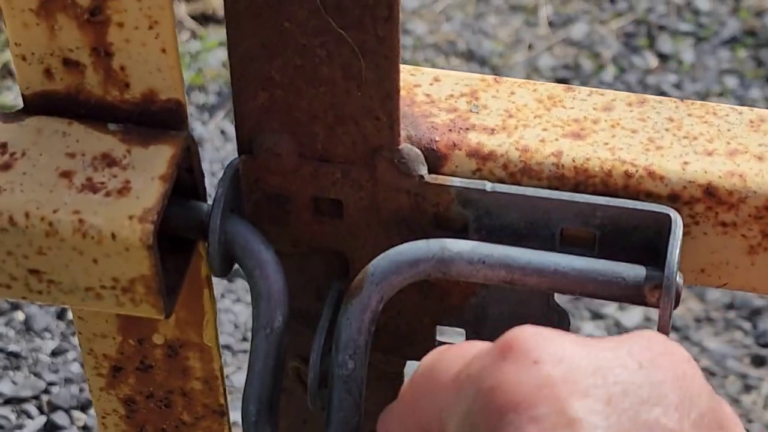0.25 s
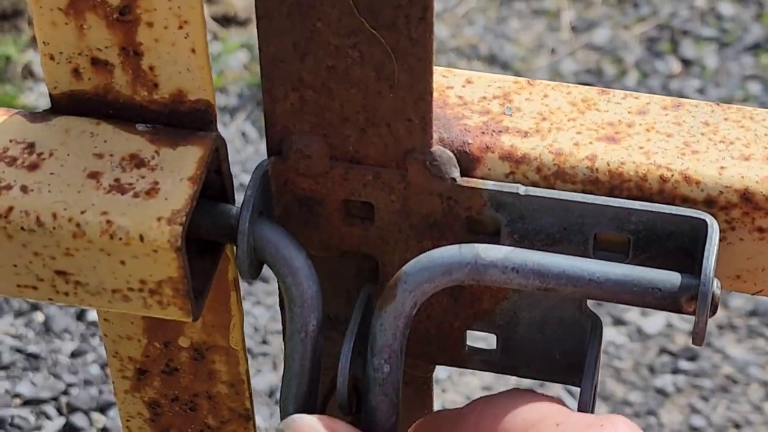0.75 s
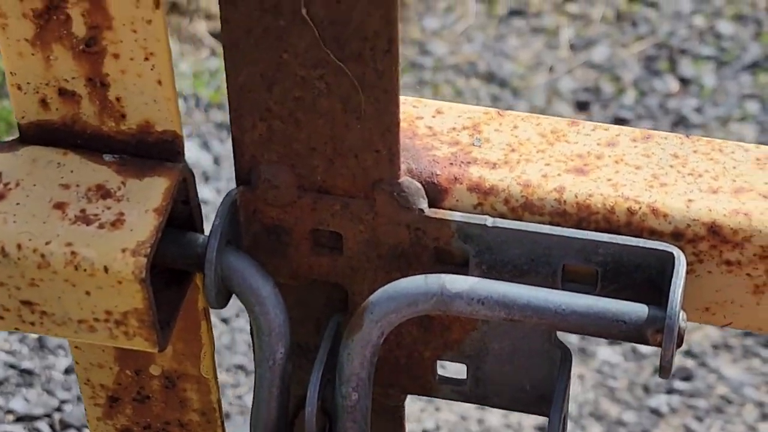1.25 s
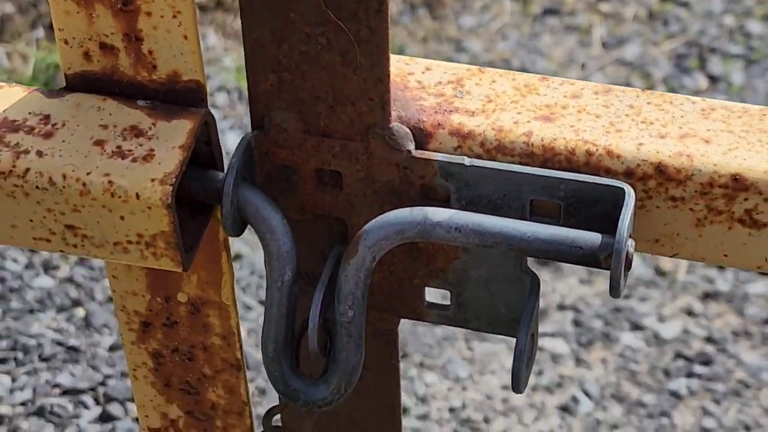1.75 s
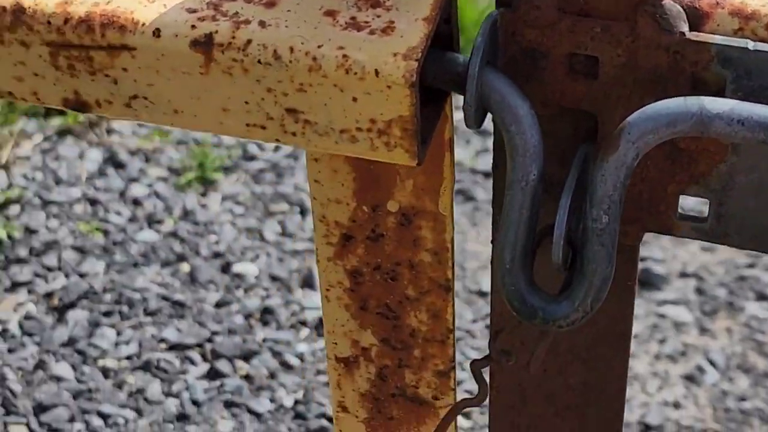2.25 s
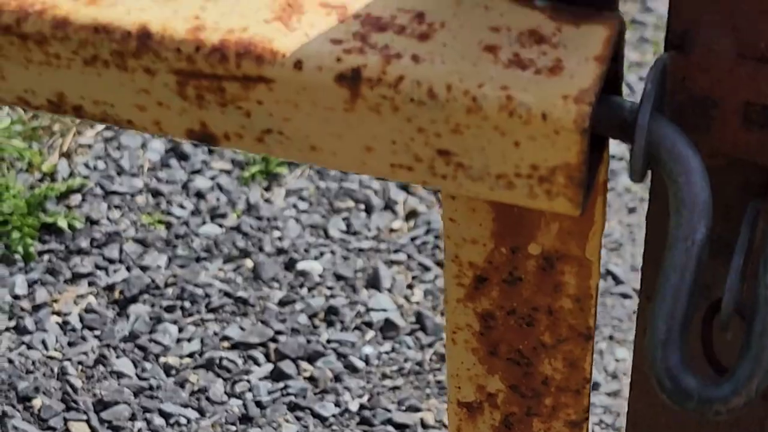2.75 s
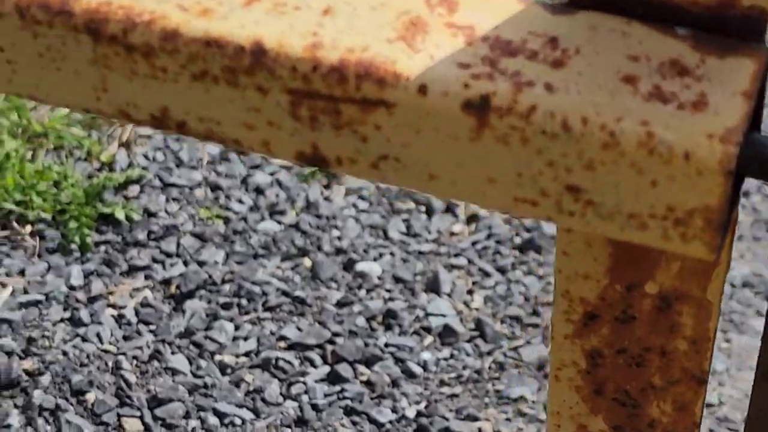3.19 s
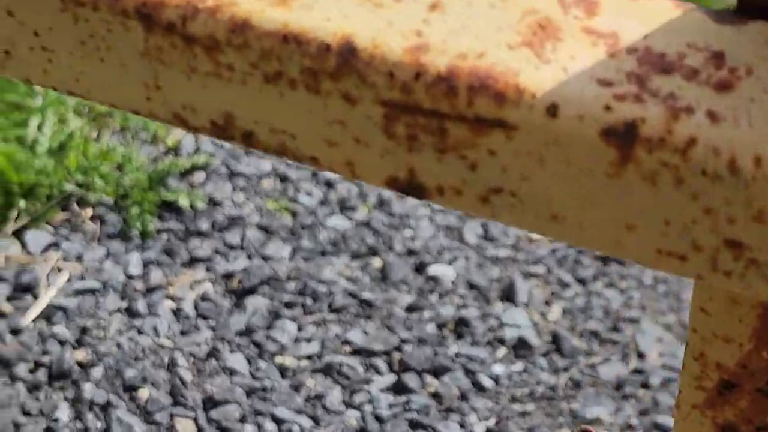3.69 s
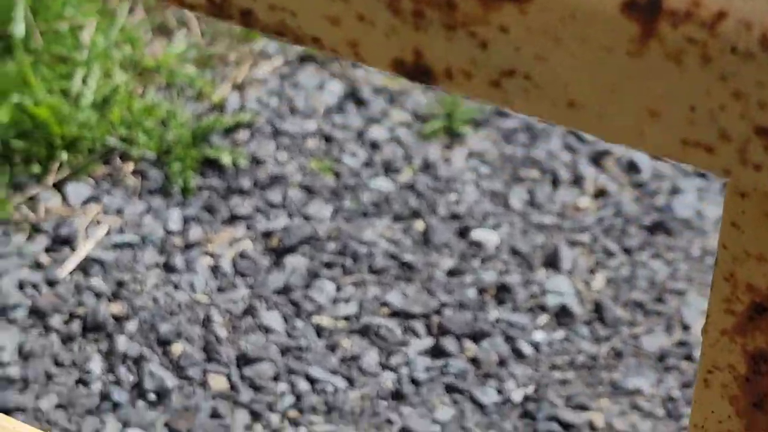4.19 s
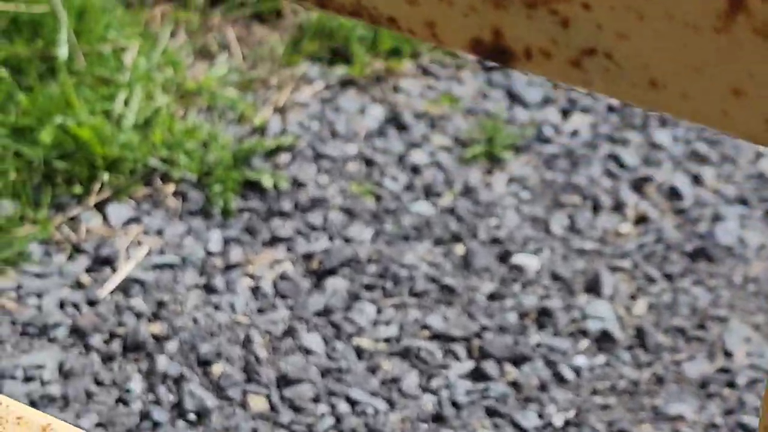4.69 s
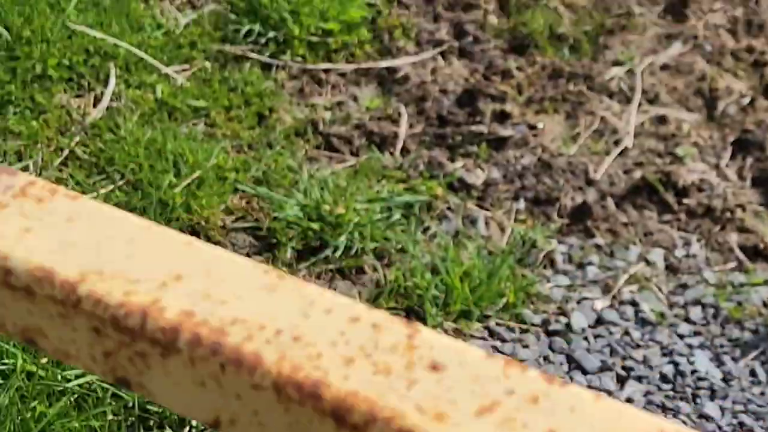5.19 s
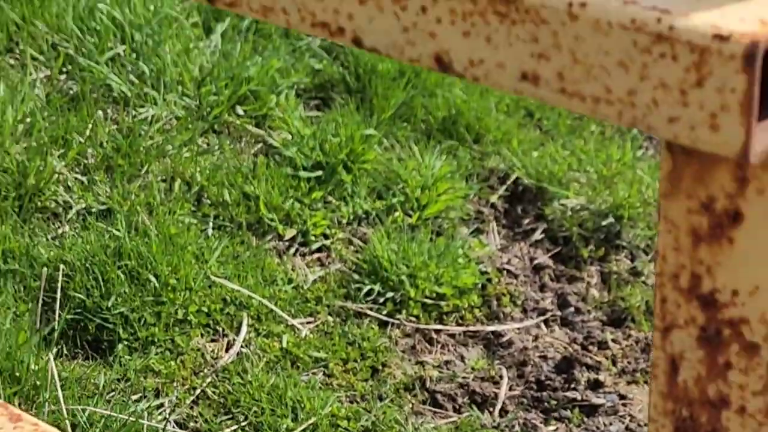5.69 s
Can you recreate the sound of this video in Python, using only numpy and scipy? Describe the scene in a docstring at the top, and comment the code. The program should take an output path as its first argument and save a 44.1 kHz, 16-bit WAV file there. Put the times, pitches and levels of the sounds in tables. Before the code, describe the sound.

Outdoors in rumbling wind, a gate latch clanks loudly, rattles and scrapes on rust, clanks again, then gravel crunches softly with dull ticks.

```python
"""A steel bolt is shot home on a rusty tubular farm gate; the gate then shifts, scraping and knocking on the bolt.
Each blow rings modes of bolt and frame under a dense burst; slips on the rust excite the same contacts.
Shaped noise buffets the microphone as wind throughout, over a faint hiss, a far drone and a few soft bumps;
gliding sines are far birds. Near the end gravel crunches softly as filtered grit, with a few dull ticks."""
import sys
import numpy as np
from scipy import signal
from scipy.fft import rfft, irfft, next_fast_len
from scipy.io import wavfile
from scipy.ndimage import uniform_filter1d

SR = 44100
rng = np.random.default_rng(int(sys.argv[2]) if len(sys.argv) > 2 else 0)


def wrap_up_sound(samples):
    """Save the sound to the file named by the first command line argument, as 16-bit audio."""
    columns = np.atleast_2d(samples).T
    # keep every value between -1 and 1, then stretch to whole-number steps
    tamed = np.clip(columns, -1, 1)
    steps = np.round(tamed * 32767).astype(np.int16)
    wavfile.write(sys.argv[1], SR, steps)


N = 261954
TIME = np.arange(N) / SR
RING = TIME[:12288]  # time axis of one ring
STEPS = TIME[::32]  # coarse time axis for slow gains
GRIP_DB_PER_S, LET_GO_DB_PER_S = 905.5, 599  # how fast rubbing sets in and dies away

# how ringing time varies with pitch: pitch_hz, factor on the ring time
DAMPING = [(600, 2.7), (2000, 1.2), (5000, 0.71), (10000, 0.59), (16000, 0.91)]


def amp(db):
    """Turns dB into a gain."""
    return 10 ** (np.asarray(db) / 20)


def evened(x):
    """Scales a signal to rms 1."""
    return x / np.sqrt(np.mean(x ** 2) + 1e-20)


def struck(x, size=350):
    """Scales a ring so that its first 8 ms (size in samples) have rms 1."""
    return x / np.sqrt(np.mean(x[:, :size] ** 2) + 1e-20)


def read(points, hz):
    """Reads a frequency table at any pitch, on a logarithmic pitch axis."""
    f, value = np.transpose(points)
    return np.interp(np.log(hz + 1), np.log(f + 1), value)


def level(rows, axis=1):
    """Draws a dB column over time as a gain for every sample."""
    rows = np.array(rows)
    return amp(np.interp(TIME, rows[:, 0], rows[:, axis]))


def add(mix, s, sound):
    """Lays a sound into the mix at s seconds."""
    part = mix[:, max(round(s * SR), 0):][:, :sound.shape[1]]
    part += sound[:, :part.shape[1]]


def pair(hz, same):
    """Random phasors for two ports, alike by the share same (0-1)."""
    a, b = np.exp(2j * np.pi * rng.random((2, len(hz))))
    return np.array([a, same * a + np.sqrt(1 - same ** 2) * b])


def noise(spectrum, same):
    """Stereo noise of a given colour, rms 1."""
    hz = np.fft.rfftfreq(next_fast_len(N + SR, True), 1 / SR)
    return evened(irfft(pair(hz, same) * amp(read(spectrum, hz)))[:, :N])


def swell(rate_hz):
    """Slow random wandering with rms 1."""
    hz = np.fft.rfftfreq(N, 1 / SR)
    return evened(irfft(np.exp(2j * np.pi * rng.random(len(hz)) - (hz / rate_hz) ** 2), N))


def grit(per_s, spread_db, bed):
    """Sparse slips of uneven size over a bed of fine ones, rms 1."""
    size = rng.standard_normal(N) * amp(spread_db * np.minimum(rng.exponential(1, N), 3))
    slips = (rng.random(N) < per_s / SR) * size
    return evened(evened(slips) + bed * rng.standard_normal(N))


def strokes(rows, rise_db_per_s, fall_db_per_s):
    """Gain of rubbing strokes: each sets in, holds while it grows or eases, and dies away."""
    s, length, db, growth_db = np.transpose(rows)[:, :, None]
    early = np.maximum(s - STEPS, 0)
    late = np.maximum(STEPS - s - length, 0)
    held_db = db + growth_db * np.clip((STEPS - s) / length, 0, 1)
    gains = amp(np.maximum(held_db - rise_db_per_s * early - fall_db_per_s * late, -150))
    return np.interp(TIME, STEPS, np.linalg.norm(gains, axis=0))


def latch(modes_db=1.8, mode_hold=0.77, crack=.6, crack_s=.004, rise_s=0.00079, pressed_s=0.032, pan_db=-2.84):
    """Every blow cracks and rings; until the next one, slips on the rust excite the same contact."""
    # steel on steel: start_s, level_db over the first 8 ms, brightness_db_per_octave, contact pitch_hz,
    # contact strength_db, nominal ring t60_s, share of the modal ring in the bolt (0-1)
    blows = [(0.028, -52.5, -5.5, 2850, 5, 0.069, 0.9), (0.307, -51.5, -1, 10770, 11, 0.09, .2),
             (0.3208, -37, -4, 4600, 8.5, 0.097, 0.95), (0.4927, -31, -2, 2530, 11, 0.56, 1),
             (0.589, -18.5, 2, 2260, -7, 0.26, 0.14), (0.593, -21, -1.5, 2040, 6.5, 0.53, 0.98),
             (0.6852, -13, 2, 2540, 5.5, 0.32, 0.96), (0.692, -14, 3, 4570, 10, 0.062, 1),
             (0.707, -16, 3.5, 2640, 4.5, 0.34, 0.66), (0.725, -10, 4.5, 1570, 8.5, .22, 0.89),
             (0.836, -28.5, -1.5, 3750, 1, 0.14, 1), (0.861, -36.5, -7, 2760, 10, .11, 0.87),
             (2.357, -39.5, -0.5, 3050, 0.5, 0.2, .2), (2.463, -38, -2, 2340, 5, 0.23, 0),
             (2.548, -30, -6.5, 3800, 22.5, 0.16, 0), (2.56, -33, -6, 3720, -0.5, 0.068, 0),
             (2.655, -45, -9, 3490, -1, 0.14, .25), (2.702, -35, -4, 3740, 20.5, 0.17, 0.15),
             (2.722, -30, -2, 2650, 13, 0.12, 0.04), (2.728, -28.5, -1.5, 3780, 8.5, 0.27, 0),
             (2.772, -22.5, -1.5, 4700, 7.5, 0.11, 0.92), (2.995, -46.5, -6.5, 2640, 1.5, 0.064, 0.38),
             (3.193, -46.5, -2.5, 3040, 8, .11, .1), (3.226, -44.5, -3, 5080, -1, 0.13, 0.4),
             (3.293, -34.5, -1, 6030, 8, 0.18, 0.12), (3.422, -44, -5, 1430, 14, .08, 0.1),
             (3.437, -40, -6.5, 13200, 11, 0.076, 0.1), (3.451, -30, -8, 3450, 14, 0.1, 0.15),
             (3.473, -42.5, -7, 800, 10, 0.23, .1), (3.52, -37.5, -12.5, 12440, 22, 0.18, 0),
             (3.561, -41, -9.5, 13000, 15, 0.097, 0.3), (3.691, -44.5, 1, 3490, 14, 0.067, .1),
             (3.701, -28, -4.5, 3380, 5.5, 0.12, 0.03), (3.801, -40, -2.5, 3830, 6, 0.11, 0),
             (3.875, -40, -2.5, 12900, 9, 0.14, 0.4), (3.908, -28.5, -1.5, 1500, 8.5, 0.14, .45),
             (3.921, -23, -5, 3100, 13.5, 0.078, 0.6), (4.004, -35.5, -6, 13000, 7, 0.08, 0),
             (4.049, -35, -7.5, 12900, 12.5, 0.15, 0.7), (4.111, -44.5, -6.5, 12900, 16, 0.12, 0.15),
             (4.135, -40.5, -4.5, 1300, 7, 0.16, 0.14), (4.297, -34.5, -3, 1340, 8, 0.11, 0),
             (4.323, -43, -2, 1310, -1.5, 0.064, 0), (4.38, -33, -1.5, 2080, 10.5, 0.17, .25),
             (4.401, -16.5, -4, 13200, 10, 0.17, 0.4), (4.405, -19, 1, 2950, 20, 0.14, 0.5),
             (4.437, -23, -2, 1346, -1, .1, 0.2), (4.4437, -16, 4.5, 1430, 5, 0.17, 0),
             (4.46, -21.5, -0.5, 2380, 7, 0.18, 1), (4.48, -20, -4, 11000, 13.5, 0.14, 0.73),
             (4.49, -20.5, 4.5, 900, 22, 0.19, 0.14), (4.705, -43.5, -4.5, 3490, 5.5, 0.13, 0.1),
             (5.281, -48, -4.5, 7450, 2.5, 0.3, .1)]
    # modes of the bolt and its bracket: pitch_hz; relative level_db
    bolt_hz = [1510, 1555, 1916, 2231, 2580, 2734, 2917, 3160, 4044, 4848, 5089, 5362, 5812, 6330, 6870,
               7345, 8182, 8328, 9011, 9350, 9528, 10067, 10869, 11857, 11908, 12801, 13641, 14362]
    bolt_db = [-3, -12.5, -6.5, -1, -2.5, -13, -9, 1, 0, 2, -1.5, -0.5, 5, 2.5, 0.5, -1.5, -4.5, 0, -3,
               -6.5, -5.5, -2.5, -9, 1, -1.5, -12.5, -21.5, -4]
    # modes of the gate frame: pitch_hz; relative level_db
    frame_hz = [800, 912, 1065, 1205, 1388, 1490, 1582, 1894, 2050, 2366, 2550, 2734, 2940, 3095, 3231,
                3655, 3755, 4085, 4775, 5361, 5500, 6310, 7335, 7505, 8250, 9646, 10058, 11347, 13030,
                14351]
    frame_db = [-15.5, -15.5, -9, -8, -5, -9, -7.5, -0.5, -2.5, -0.5, -1, 1, 1, -5.5, 0.5, -6, -8, 0, 5.5,
                -3, 3.5, 0, 8.5, -3, -10, -7.5, -2, -12.5, -7.5, -3]
    bolt, frame = waves(bolt_hz, bolt_db), waves(frame_hz, frame_db)
    pan = amp([[pan_db / 2], [-pan_db / 2]])  # left minus right
    slips = rubbing()
    travel = swell(rate_hz=6.4)  # the rubbing wanders between two spots of rust
    edges = [0] + [round(row[0] * SR) for row in blows[1:]] + [N]
    out = np.zeros((2, N))
    for (s, db, *colour, t60, share), a, b in zip(blows, edges, edges[1:]):
        hold = t60 * mode_hold
        modes = np.sqrt(share) * ring(bolt, colour, hold) + np.sqrt(1 - share) * ring(frame, colour, hold)
        free = min(t60 / .15, 1.2)  # parts that stay pressed together ring less
        cracked = clash(colour, t60) * (1 + crack * np.exp(-RING / crack_s))
        sound = cracked + amp(modes_db) * free * modes
        sound = sound * (1 - np.exp(-RING / rise_s))  # rust cushions the contact
        sound = struck(sound * pan)
        add(out, s, amp(db) * sound)
        span = slice(a, max(b, a + 1))
        for spot, weight in (sound, np.cos), (clash(colour, t60), np.sin):
            damped = (spot * np.exp(-RING / pressed_s))[:, :len(RING) // 2]
            rub = signal.fftconvolve((slips[span] * weight(travel[span]))[None], damped, axes=1)
            add(out, a / SR, rub / np.sqrt((damped ** 2).sum() / 2))
    return out


def waves(hz, db):
    """The undamped oscillation of every mode."""
    hz = np.array(hz, float)
    return hz, (amp(db)[:, None] * np.exp(2j * np.pi * hz[:, None] * RING)).astype(np.complex64)


def ring(body, colour, t60, scatter_db=3.5, clear_hold=1.79):
    """Each blow weights the modes differently; damping varies with pitch, and a few clear modes sing on."""
    # modes that ring longer than their neighbours: pitch_hz
    clear_hz = [912, 7505, 10058, 11347]
    hz, shapes = body
    scatter = amp(scatter_db * rng.standard_normal(len(hz)))
    weight = pair(hz, 0.7) * ports(hz) * contact(hz, *colour) * scatter
    hold = t60 * read(DAMPING, hz) * np.where(np.isin(hz, clear_hz), clear_hold, 1)
    fall = (np.log(1000) / hold).astype(np.float32)
    decay = np.exp(-fall[:, None] * RING.astype(np.float32))
    return struck((weight.astype(np.complex64) @ (shapes * decay)).real)


def clash(colour, t60, count=170):
    """A crowd of weaker modes, other ones at each contact, merges into a burst."""
    # colour of the crowd: pitch_hz, relative density_db per Hz
    steel = [(150, -56), (500, -23.5), (850, -15.5), (1200, -12), (1600, -9), (2200, -2.5), (3100, -5),
             (4200, -0.5), (6200, 0), (8000, -1), (9600, -4.5), (10700, -10.5), (12000, -7), (16000, -20.5)]
    hz = np.fft.rfftfreq(len(RING), 1 / SR)
    crowd = np.full(len(hz), .12)
    crowd[rng.integers(100, len(hz), count)] = 1
    burst = irfft(crowd * pair(hz, 0.26) * ports(hz) * amp(read(steel, hz)) * contact(hz, *colour))
    # every band dies away at its own rate
    f, t, z = signal.stft(burst, SR, nperseg=256)
    z = z * amp(-60 * t / (t60 * read(DAMPING, f)[:, None]))
    return struck(signal.istft(z, SR, nperseg=256)[1][:, :len(RING)])


def contact(hz, slope_db, focus_hz, focus_db, width=.33):
    """Harder contacts are brighter, and each favours one region of pitch (width in octaves)."""
    bump = np.exp(-(np.log2((hz + 1) / focus_hz) / width) ** 2)
    return amp(slope_db * np.log2(np.maximum(hz, 1200) / 4000) + focus_db * bump)


def ports(hz):
    """Phase and level at the two ports for sound from the latch."""
    # phase between the ports: pitch_hz, left_lead_rad
    lead = [(0, -5), (1380, 2.5), (2330, 6.5), (3270, 14.5), (3700, 12.5), (5340, 18), (5680, 15.5),
            (6370, 28), (6890, 19), (9650, 29), (9990, 20.5), (16400, 16.5)]
    # level between the ports: pitch_hz, left_minus_right_db
    lean = [(60, 0.5), (110, -10.5), (200, 0), (380, -1), (700, 0), (1290, 1.5), (2380, -5), (4400, 1.5),
            (8120, 8), (15000, -3.5)]
    side = np.array([[.5], [-.5]])
    return amp(side * read(lean, hz)) * np.exp(1j * side * read(lead, hz))


def rubbing(taps_per_s=12, tap_db=2.5, tap_s=0.013):
    """Slips on the rust: firm scrapes, and light chafing with a tiny tap now and then."""
    # the bolt scrapes over rust: start_s, length_s, starting level_db, growth_db over the stroke
    scrapes = [(.49, 0.11, -33, -10), (.605, 0.12, -24.5, -5.5), (.75, 0.01, -37, -3),
               (2.41, 0.021, -41.5, -3), (2.47, 0.098, -38.5, -1.5), (2.78, 0.04, -49, 2),
               (3.16, 0.032, -59, 10.5), (3.475, 0.031, -44.5, -10), (3.99, 0.065, -52, 10),
               (4.155, 0.014, -42.5, -2.5), (4.28, 0.033, -49.5, 6), (4.36, 0.047, -40.5, 16),
               (4.445, 0.043, -29.5, -9)]
    # the bolt lies loose in its bracket and chafes: start_s, length_s, starting level_db, growth_db
    chafes = [(0, 0.37, -59, -1), (2.97, 0.65, -60.5, 6.5), (3.64, 0.82, -59, -2)]
    chafe = strokes(chafes, GRIP_DB_PER_S, LET_GO_DB_PER_S)
    pressure = np.hypot(strokes(scrapes, GRIP_DB_PER_S, LET_GO_DB_PER_S), chafe)
    # at full size and 0 dB a tap holds the energy of tap_s of chafing
    taps = (rng.random(N) < taps_per_s / SR) * rng.uniform(0.35, 1, N) * np.sqrt(tap_s * SR)
    slips = grit(per_s=800, spread_db=4, bed=.4)
    return pressure * slips + amp(tap_db) * chafe * taps


def gravel(crunch_db_per_s=707.5, settle_db_per_s=803):
    """Small stones grind together: coloured grit that builds and settles quickly."""
    # gravel shifts: start_s, length_s, starting level_db, growth_db
    crunches = [(2.11, 0.02, -59.5, -4), (5.36, 0.061, -44.5, -5.5), (5.41, 0.28, -55, -1),
                (5.56, 0.0029, -41, 13), (5.645, 0.038, -44.5, -8), (5.792, .004, -54.5, 8.5),
                (5.84, 0.063, -57, 3)]
    # colour of the stones: pitch_hz, relative density_db per Hz
    stones = [(240, -47), (400, -14), (935, -18), (1350, -6.5), (2120, -12), (2840, -16.5), (4380, -17.5),
              (5780, -16.5), (16000, -28)]
    hz = np.fft.rfftfreq(N, 1 / SR)
    grains = np.array([grit(per_s=1800, spread_db=2, bed=.4) for _ in range(2)])
    mixed = grains + 0.13 * grains[::-1]  # a little of each port leaks into the other
    pressure = strokes(crunches, crunch_db_per_s, settle_db_per_s)
    return pressure * evened(irfft(rfft(mixed) * amp(read(stones, hz)), N))


def ticks(length_s=0.00057, grind_db=-15, grind_s=0.0036):
    """Two or three soft cycles each, with a short grinding tail."""
    # dull ticks: centre_s, peak_db, pitch_hz
    tick_rows = [(1.880, -37, 1350), (1.895, -29, 1312), (5.5549, -23, 1545), (5.558, -19.5, 1730),
                 (5.563, -17, 1500), (5.627, -33, 1590), (5.634, -30, 1700), (5.661, -30.5, 1010),
                 (5.671, -34.5, 1800), (5.682, -33, 1940), (5.826, -31, 1630), (5.831, -20.5, 1670),
                 (5.8437, -22, 1600), (5.859, -26.5, 1430), (5.870, -31.5, 1640), (5.896, -25, 1390)]
    out, t = np.zeros((2, N)), np.arange(-128, 128) / SR
    for s, db, hz in tick_rows:
        phase = 2 * np.pi * rng.random() + np.array([[0], [.6]])
        tick = np.exp(-(t / length_s) ** 2) * np.cos(2 * np.pi * hz * t + phase)
        tail = rng.standard_normal((2, len(RING))) * np.exp(-RING / grind_s)
        grind = struck(signal.fftconvolve(tick, tail, axes=1))
        add(out, s + t[0], amp(db) * tick)
        add(out, s + t[0], amp(db + grind_db) * grind)
    return out


def bumps(cycles=1.26):
    """Soft low pushes of a few cycles on the microphone, felt at both ports."""
    # bumps: centre_s, peak_db, pitch_hz
    bump_rows = [(0.825, -26, 64.4), (1.013, -18, 122.2), (2.028, -32, 171), (2.223, -30.5, 201)]
    out, t = np.zeros((2, N)), np.arange(-2048, 2048) / SR
    for s, db, hz in bump_rows:
        phase = 2 * np.pi * rng.random() + np.array([[0], [.4]])
        push = np.exp(-(t * hz / cycles) ** 2) * np.cos(2 * np.pi * hz * t + phase)
        add(out, s + t[0], amp(db) * push)
    return out


def wind(buffet_db=-1.5, flutter_db=2.0, air_db=-5.5, lumps_db=1.0, flicker_db=3.5):
    """Big eddies thump both ports, small ones flutter at each, and gusts lift both; a distant wash lies behind."""
    # colours of big eddies, small eddies and wash: pitch_hz, relative density_db per Hz
    big_colour = [(8.8, -33.5), (15, -19.5), (43, 3.5), (73, 6), (113, 0.5), (184, -19), (220, -25),
                  (290, -52), (480, -120)]
    small_colour = [(90, -8.5), (150, 5), (220, -3.5), (300, -10.5), (450, -21.5), (700, -30.5),
                    (1500, -58)]
    wash_colour = [(180, -26.5), (300, -6), (480, -9.5), (700, -10.5), (1050, -15.5), (1400, -11.5),
                   (1700, -15.5), (2050, -8.5), (2600, -23), (4000, -39), (16000, -64.5)]
    # strength of the wash before its trim air_db: time_s, level_db
    wash_level = [(0, -57.5), (.54, -53.5), (1.19, -47), (1.8, -57.5), (2.15, -51.5), (2.7, -58),
                  (4.5, -51.5), (5.5, -56.5), (5.94, -42.5)]
    big, small = blowing(axis=1), blowing(axis=2)
    lumps = amp(buffet_db + lumps_db * swell(rate_hz=9))
    flicker = amp(flutter_db + flicker_db * swell(rate_hz=37))
    buffet = big * lumps * turbulence(big_colour, same=0.82, smooth_s=0.16)
    flutter = small * flicker * turbulence(small_colour, same=0.21, smooth_s=0.017)
    wash = level(wash_level) * noise(wash_colour, same=0.22) * amp(air_db)
    return buffet + flutter + wash


def blowing(axis):
    """Strength of one size of eddy: the steady wind with the single gusts on top."""
    # steady wind, before the trims in wind(): time_s, buffeting_db, flutter_db
    steady = [(0, -31, -78), (.4, -37, -54), (.53, -44.5, -68), (.62, -32.5, -57.5), (1.05, -34.5, -44.5),
              (1.35, -45.5, -59.5), (1.62, -52.5, -61), (2.1, -39, -43), (2.33, -38, -49),
              (2.6, -29, -44.5), (3.05, -29, -35.5), (3.45, -38.5, -44.5), (3.55, -39, -62),
              (3.72, -32, -51.5), (4.5, -30.5, -45), (5, -30, -46.5), (5.65, -32.5, -50), (5.92, -33, -47)]
    # gusts that swell and sink, before the same trims: centre_s, width_s (one sigma), buffeting_db, flutter_db
    gust_rows = [(.03, 0.028, -27.5, -51.5), (0.419, 0.018, -28, -51), (0.831, 0.024, -28.5, -55.5),
                 (1.488, 0.016, -32, -56), (1.8, 0.044, -23.5, -44), (2.149, 0.041, -58, -43),
                 (2.41, 0.021, -28.5, -43), (2.51, 0.037, -47, -40.5), (2.579, 0.012, -33, -39),
                 (2.75, 0.014, -22.5, -38.5), (3.009, 0.025, -23.5, -41), (3.322, 0.015, -23, -55),
                 (3.7, 0.028, -23, -59), (3.922, 0.017, -25.5, -51), (4.041, 0.017, -27, -41),
                 (4.44, .03, -26, -51), (4.54, .025, -28, -41), (4.998, 0.028, -28, -39),
                 (5.29, 0.0089, -23.5, -43), (5.88, 0.028, -27, -41.5)]
    rows = np.transpose(gust_rows)[:, :, None]
    arches = np.exp(-np.minimum(((STEPS - rows[0]) / rows[1]) ** 2 / 2, 20))
    peaks = np.linalg.norm(amp(rows[axis + 1]) * arches, axis=0)
    return np.hypot(level(steady, axis=axis), np.interp(TIME, STEPS, peaks))


def turbulence(spectrum, same, smooth_s):
    """Coloured noise, lumpy from moment to moment but even over a longer stretch."""
    x = noise(spectrum, same)
    return x / np.sqrt(uniform_filter1d((x ** 2).mean(0), int(smooth_s * SR) + 1) + 1e-6)


def birds(waver_hz=90):
    """Short gliding whistles, blurred by distance: their pitch wavers differently at each port."""
    # far birds: centre_s, peak level_db, middle pitch_hz, glide_hz_per_s, length_s
    chirps = [(1.328, -58, 6450, 1499, 0.072), (2.693, -51.5, 6280, -3000, 0.029),
              (2.917, -61.5, 6340, 7, 0.027), (3.07, -52.5, 6360, 1.5, 0.04),
              (3.158, -55, 3485, -9000, 0.09), (4.399, -39, 6310, -3000, 0.034),
              (4.951, -53, 3390, -12000, 0.029), (5.167, -56, 2650, -9000, 0.051)]
    out = np.zeros((2, N))
    for s, db, hz, glide, length in chirps:
        t = np.arange(-length / 2, length / 2, 1 / SR)
        wander = evened(uniform_filter1d(rng.standard_normal((2, len(RING))), size=120))
        pitch = hz + glide * t + waver_hz * wander[:, :len(t)]
        whistle = np.sin(2 * np.pi * np.cumsum(pitch, 1) / SR)
        add(out, s + t[0], amp(db) * np.hanning(len(t)) * whistle)
    return out


def drone(width_hz=55):
    """A faint far drone: a narrow band of noise, shifted up to a drifting pitch."""
    # the drone swells and shifts: time_s, level_db, pitch_hz
    drift = [(0, -63, 623), (.5, -74.5, 578), (1.25, -55.5, 478), (1.9, -72, 390), (3.198, -63, 400),
             (4.7, -63, 420), (5.94, -73.5, 391)]
    s, _, hz = np.transpose(drift)
    lowpass = signal.butter(2, width_hz, fs=SR, output="sos")
    a, b = signal.sosfilt(lowpass, rng.standard_normal((2, N)))
    turn = np.exp(2j * np.pi * np.cumsum(np.interp(TIME, s, hz)) / SR)
    return level(drift) * evened(((a + 1j * b) * turn).real)


def hiss():
    """Faint outdoor hiss: coloured stereo noise of changing level."""
    # colour: pitch_hz, relative density_db per Hz
    hiss_colour = [(1500, -11.5), (3000, 2.5), (4000, -4.5), (5000, -4), (6500, -4.5), (8200, 0),
                   (9500, -12.5), (12000, -15.5), (16000, -18.5)]
    # strength: time_s, level_db
    hiss_level = [(0, -73.5), (.9, -65), (1.4, -70), (1.62, -61.5), (1.8, -73), (1.9, -63.5), (2.3, -68.5),
                  (4.8, -71), (5.94, -65)]
    return level(hiss_level) * noise(hiss_colour, same=0.28)


def scene():
    """Sums the latch, the ground and the surroundings."""
    return latch() + gravel() + ticks() + bumps() + wind() + birds() + drone() + hiss()


def record(dry, edge_hz=16200):
    """The recorder's ceiling and band limit."""
    held = np.clip(dry, -.85, .85)
    lowpass = signal.firwin(411, edge_hz, window=("kaiser", 8), fs=SR)
    return signal.oaconvolve(held, lowpass[None], "same")


dry = scene()
out = record(dry)
wrap_up_sound(out)
```